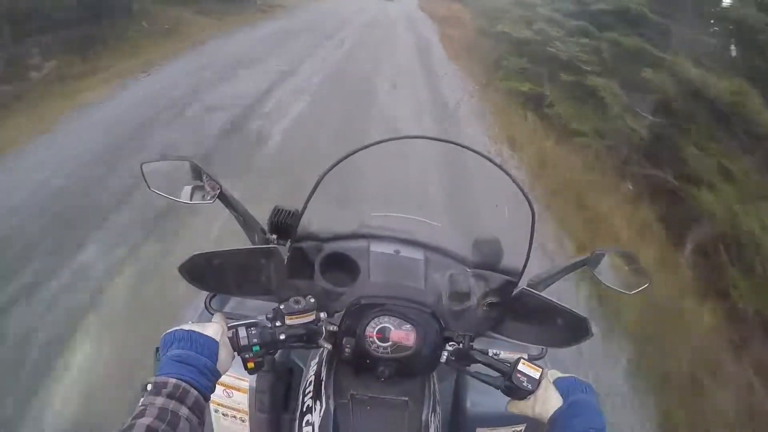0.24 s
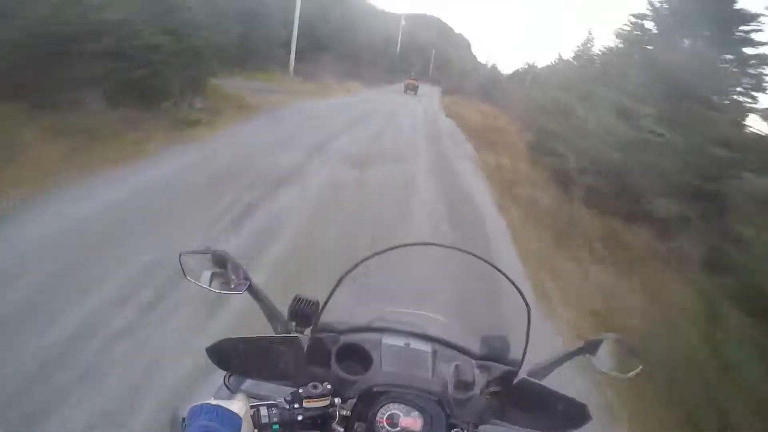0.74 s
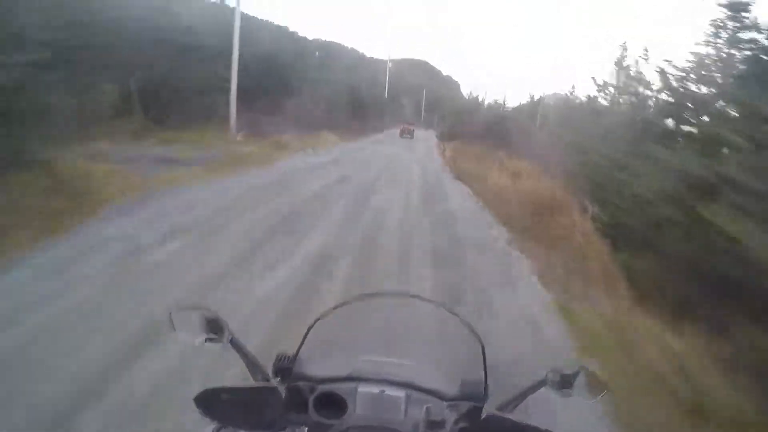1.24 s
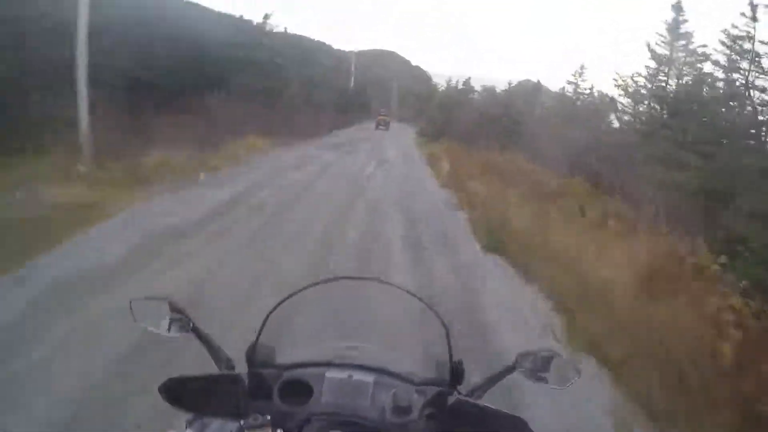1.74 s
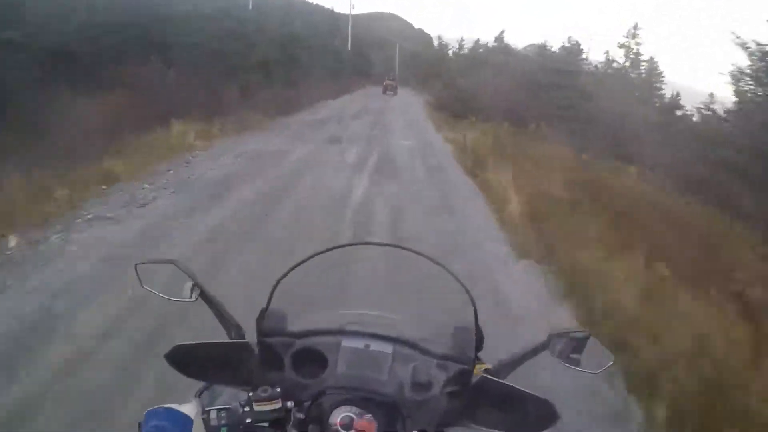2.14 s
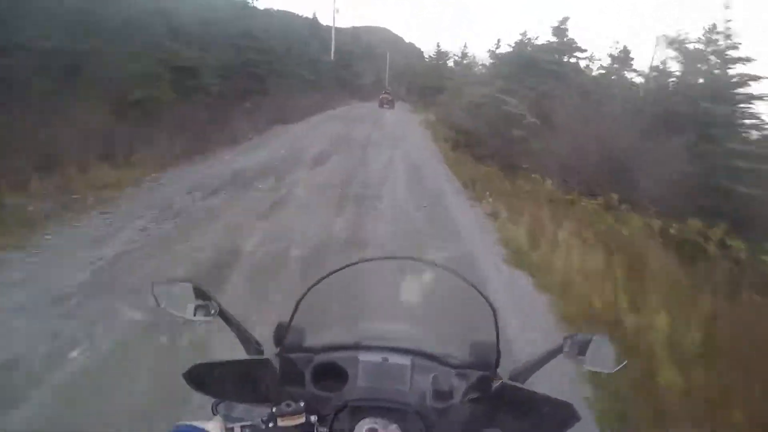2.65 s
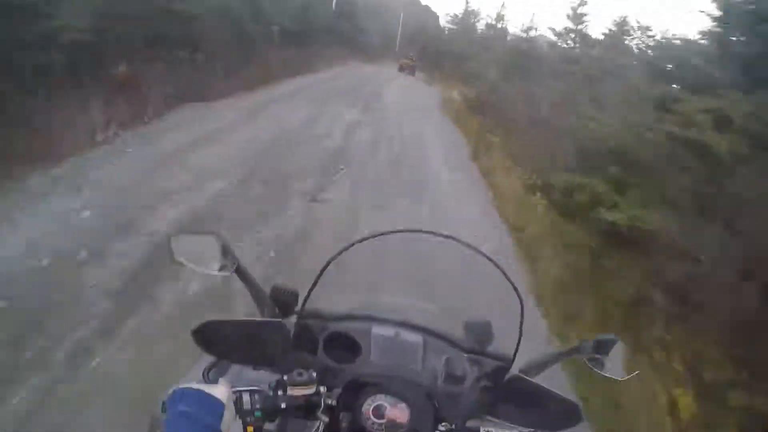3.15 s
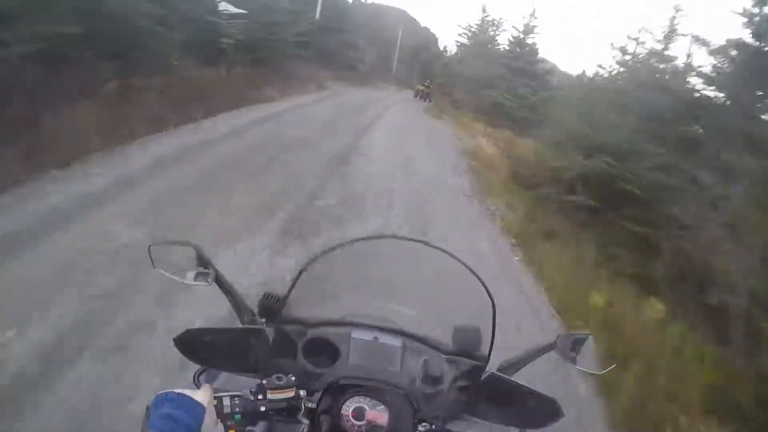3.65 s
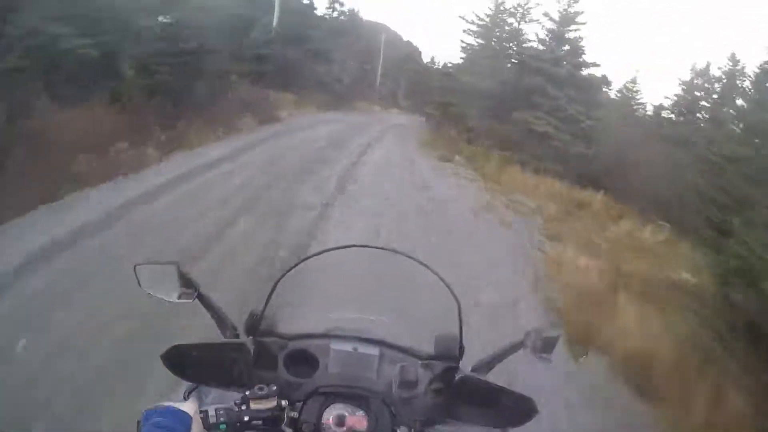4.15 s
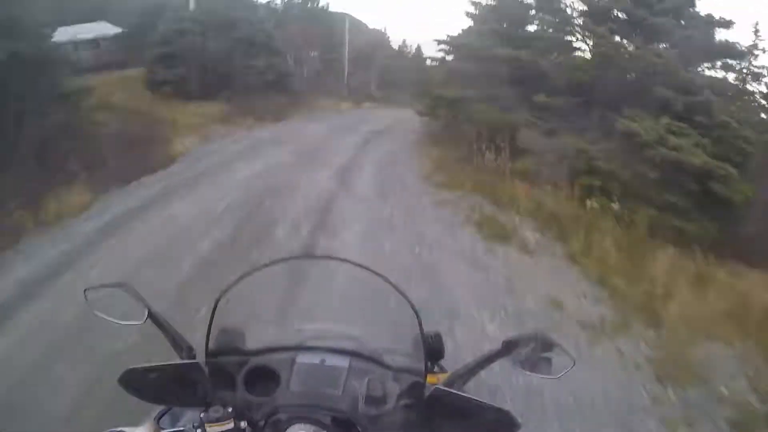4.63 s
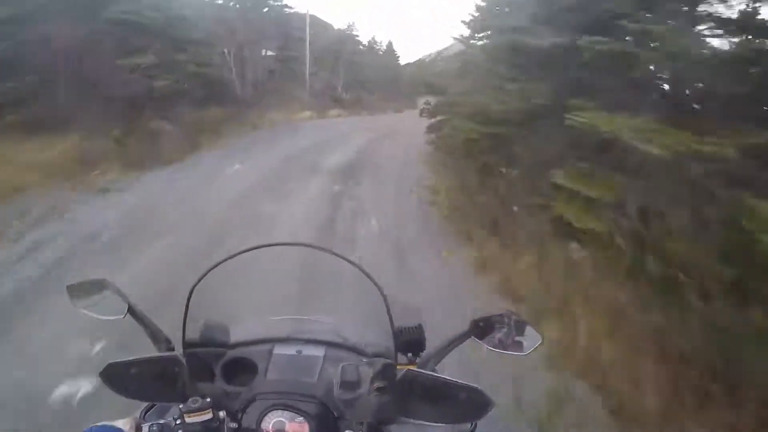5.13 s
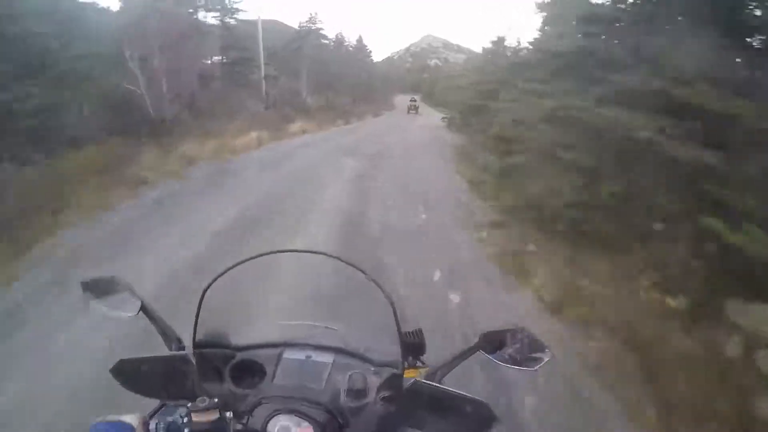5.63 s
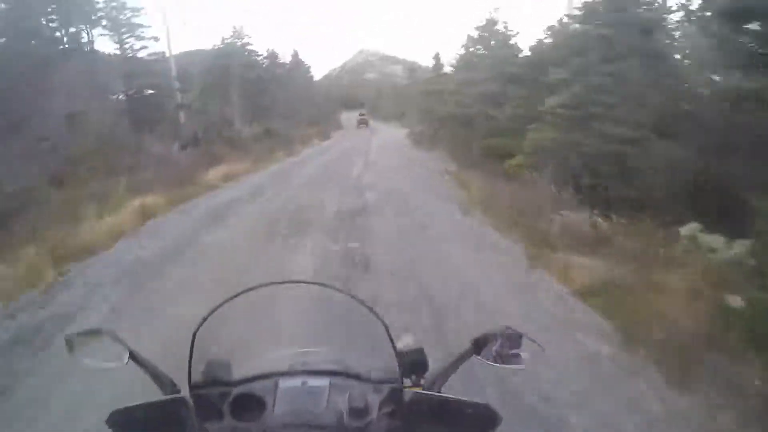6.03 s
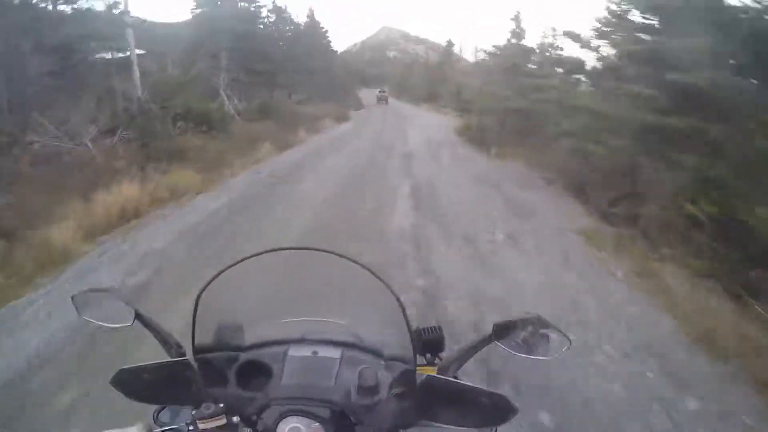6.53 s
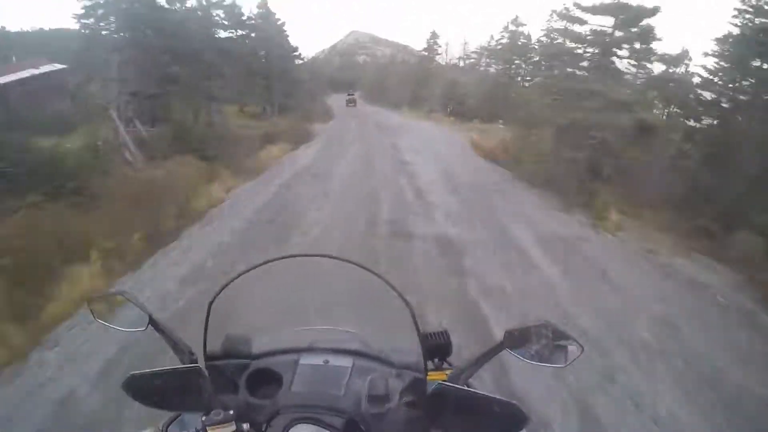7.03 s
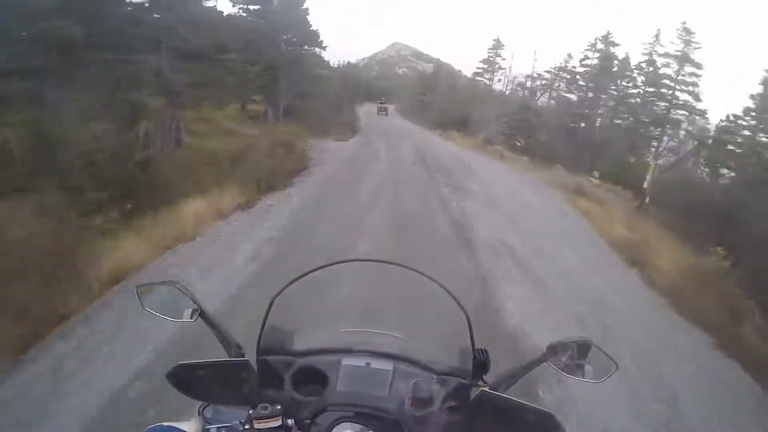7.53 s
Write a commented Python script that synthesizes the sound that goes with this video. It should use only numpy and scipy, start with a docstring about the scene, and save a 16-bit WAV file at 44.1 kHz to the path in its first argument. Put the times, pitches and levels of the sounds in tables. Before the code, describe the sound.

Hard hollow plastic clacks and dull damped thumps jolt irregularly over rushing wind, gravel road rumble and a barely audible motorcycle engine.

```python
"""A motorcycle rides along a gravel road, heard from inside the case of a camera that sits loose in its mount.
From the start, filtered noise gives wind and tyre hiss and road rumble, over a faint pulse-train engine.
From about 0.5 s each jolt rings the plastic case in short rattles of contact pulses and swings the mount in a
low, damped thump; softer dips, thin ticks and, from 1.35 s, a few stick-slip squeaks come between.
The bumps go on until about 7.6 s, where the rush of wind and tyres swells to its loudest."""
import sys
import numpy as np
from scipy import signal
from scipy.fft import rfft, irfft
from scipy.io import wavfile
from scipy.ndimage import uniform_filter1d, minimum_filter1d

SR = 44100
rng = np.random.default_rng(int(sys.argv[2]) if len(sys.argv) > 2 else 0)


def wrap_up_sound(samples):
    """Save the sound to the file named by the first command line argument, as 16-bit audio."""
    columns = np.atleast_2d(samples).T
    # keep every value between -1 and 1, then stretch to whole-number steps
    tamed = np.clip(columns, -1, 1)
    steps = np.round(tamed * 32767).astype(np.int16)
    wavfile.write(sys.argv[1], SR, steps)


N = 343098

# soft dips in the road swing the mount and let the case tap its stop, levels relative:
# (time [s], swing level [dB], early swing pitch before stiffening [Hz], tap level [dB])
SOFT_DIPS = [(0.575, -4, 54, -18), (0.71, -7.5, 69, -18), (1.085, -11.5, 73.4, -32),
             (1.146, -7.5, 62.6, -32), (1.423, 1.5, 60.7, -16), (1.536, -17, 48.4, -16.5),
             (1.9, -5, 80, -24), (2.285, -10, 47, -18), (2.36, -5.5, 58.7, -13), (3.141, -4.5, 64, -36),
             (3.925, -0.5, 65, -25), (4.13, -12, 62, -30), (4.395, -10, 68.4, -26), (4.547, 1, 63, -22),
             (4.688, -10, 90, -17), (4.78, -10, 67, -29), (5.208, -1, 72.8, -15.5),
             (5.784, -18, 59.3, -19.5), (6.135, -1.5, 58.6, -26), (6.32, -8.5, 62.4, -25),
             (6.563, -3, 55, -20), (6.823, -9.5, 64, -25), (7.075, -7, 56, -14), (7.152, -21, 59.4, -19),
             (7.396, -9, 47.7, -21), (7.64, -6, 49.2, -20)]
# hard jolts throw the case against its stop and swing the mount; the case falls back a moment later; levels relative:
# (time [s], knock level [dB], treble lift [dB], hollow body lift [dB], swing level [dB],
#  early swing pitch before stiffening [Hz], rebound delay [s], rebound knock level [dB])
HARD_JOLTS = [(0.536, -5.5, 0, -4, 1.5, 103, 0.014, -5), (0.627, -11, 8, -4, -14, 70, 0.011, -11.5),
              (0.768, -5, 7, -3.5, -7, 71, 0.031, -3.5), (0.868, -16, 2, -5, -2, 45, 0.0077, -9.5),
              (0.935, -1.5, 1, 1, -15, 46, 0.035, -32), (1.486, 1.5, 11, -1, -1.5, 89, 0.024, -14),
              (1.575, -3.5, 6.5, 0.5, -16, 76.6, 0.029, -28), (1.752, -10.5, 9, 0, -11, 70, 0.013, -12.5),
              (1.864, 0.5, 8.5, 1.5, -6.5, 46, 0.037, -12), (1.915, -13.5, 7, 6, 0, 54.5, 0.022, -8.5),
              (2.06, -3, 5, 1, -0.5, 102, .027, -5), (2.677, -7.5, -9, 9, -10, 89, 0.032, -24),
              (2.825, -2.5, 6, 0.5, 0.5, 47, 0.0098, -9), (2.95, -8.5, 6, 3, -2, 72.4, 0.0092, -6),
              (3.058, -6.5, 0, -1, -2.5, 63, 0.022, -26), (3.115, -2.5, 3, -0.5, -11, 78.8, 0.017, -14),
              (3.485, -17, -6, -7, -4, 53.7, .048, -19), (3.944, -4.5, 0, -4, 5, 61, 0.01, -12),
              (3.973, -11.5, 6, -3, -13, 45.7, 0.013, -9.5), (4.037, -2.5, 12.5, -5, -6, 48, .022, -12),
              (4.094, -3, 6, 0.5, 1.5, 55, 0.0082, -6.5), (4.221, -7.5, 4, -1, -2.5, 99.5, .022, -6.5),
              (4.525, -13, 6, 3, -13, 110, 0.036, -30), (4.678, 2, -5, 4, 0, 81, .0385, -3),
              (5.045, -10.5, 1, 2.5, 0.5, 84, 0.019, -8.5), (5.406, -3, 6, 4, 5, 90.5, 0.027, -7),
              (5.542, -6.5, 1, -7.5, 1, 75, 0.019, -11), (5.701, -4.5, 0, -1.5, 0.5, 48, 0.024, -9.5),
              (5.857, -9, -10, -1, 1, 57, 0.038, -24), (5.982, 0.5, 6, 1.5, 0, 106.2, 0.03, -10),
              (6.112, -5, 4.5, 3, -12, 49.3, 0.027, -9.5), (6.244, -3.5, 4, -0.5, -7, 98.5, 0.032, -3),
              (6.4, -8.5, 6, -2, -8.5, 84, 0.0095, -13.5), (6.455, -7.5, 6, -0.5, -21, 54, .006, -5.5),
              (6.538, -7.5, 6, 8, -0.5, 97, 0.037, -17.5), (6.667, -11, 9, -2, -2.5, 100.4, 0.014, -11.5),
              (6.868, -14, 4, 11, -28, 61.3, .03, -41), (7.035, -4.5, 2, 1.5, 3.5, 96, .028, -10),
              (7.22, -7, 7, 0, 1.5, 90, .01, -13.5)]
# smooth spectrum of a knock on the case: (frequency [Hz], relative level [dB])
KNOCK_SPECTRUM = [(60, 15), (180, 7.5), (320, -6), (550, -14), (1000, -12), (1300, -4), (1800, 0),
                  (2150, -3.5), (2650, 0), (3400, -14), (4400, -29.5), (7000, -34), (10000, -47),
                  (15000, -52)]
# resonances of the plastic case: (centre frequency [Hz], width [Hz], nominal lift [dB])
CASE_MODES = [(504, 40, 3), (586, 93, 2.5), (747, 117, 8), (1268, 49, 4), (1550, 145, 3.5), (1630, 21, 1),
              (1800, 220, 3), (2295, 150, 1.5), (2540, 230, 3), (3263, 290, 5), (3984, 620, 6),
              (5410, 1130, 6.5), (7800, 180, 2), (10870, 780, 5)]


def undb(db):
    """Amplitude ratio of a level: 20 dB for each factor of ten."""
    return 10 ** (np.asarray(db) / 20)


def unit(x):
    """Normalise the mean power: scale to rms 1."""
    return x / np.sqrt(np.mean(x ** 2))


def curves(table):
    """Linear interpolation in time of each column of a table."""
    times, *columns = np.transpose(table)
    t = np.arange(N) / SR
    return [np.interp(t, times, column) for column in columns]


def walk(rate):
    """Low-pass random fluctuation: levels held for 1 / rate [s], averaged twice, rms 1."""
    hold = max(int(SR / rate), 2)
    steps = np.repeat(rng.standard_normal(N // hold + 1), hold)
    smooth = uniform_filter1d(uniform_filter1d(steps, hold), hold)
    return unit(smooth[:N])


def response(colour, resonances=(), size=8192):
    """Minimum-phase impulse response, by folding the cepstrum of a smooth spectrum plus resonances."""
    f = np.maximum(np.arange(size // 2 + 1) * SR / size, 1)
    hz, db = np.transpose(colour)
    gain_db = np.interp(np.log(f), np.log(hz), db)
    for centre, width, lift in resonances:
        gain_db = gain_db + lift / (1 + (2 * (f - centre) / width) ** 2)
    cepstrum = irfft(np.log(undb(gain_db)))
    # doubling the causal half and dropping the rest makes the response causal
    cepstrum[1:size // 2] *= 2
    cepstrum[size // 2 + 1:] = 0
    return irfft(np.exp(rfft(cepstrum)))


def through(x, ring):
    """Linear filtering: convolve a sound with an impulse response."""
    return signal.fftconvolve(x, ring)[:len(x)]


def band(x, lo_hz, hi_hz):
    """Butterworth band-pass with gentle slopes."""
    sections = signal.butter(2, [lo_hz, min(hi_hz, .45 * SR)], "band", fs=SR, output="sos")
    return signal.sosfilt(sections, x)


def add(out, s, sound):
    """Superposition: mix a sound in at time s [s]."""
    i = max(int(s * SR), 0)
    out[i:i + len(sound)] += sound[:N - i]


def engine(wander=0.0051, rough_db=2, weak_db=-5, gain_db=0):
    """Periodic excitation: one muffled exhaust pulse per firing, strong and weak in turn."""
    # (time [s], mean firing rate [Hz], level [dB])
    engine_course = [(0, 94.2, -37.5), (.5, 95.5, -42.5), (1.4, 104.2, -43.5), (2.3, 90.4, -48),
                     (3.15, 90.4, -42), (3.45, 101.1, -39.5), (3.6, 105, -39), (3.85, 110.5, -34),
                     (4.3, 105.6, -47), (4.85, 96.7, -51), (6, 101.6, -46), (7.78, 94.3, -47.5)]
    # smooth spectrum of the muffled exhaust: (frequency [Hz], relative level [dB])
    exhaust_spectrum = [(40, -19), (100, 7.5), (200, -6), (330, -10.5), (470, -9.5), (620, -19),
                        (1200, -44)]
    firing_hz, level_db = curves(engine_course)
    unsteady_hz = firing_hz * (1 + wander * walk(12))
    firings = np.floor(np.cumsum(unsteady_hz) / SR)
    strength_db = rough_db * walk(50) + weak_db * (firings % 2)
    pulses = np.diff(firings, prepend=0) * undb(strength_db)
    exhaust = band(through(pulses, response(exhaust_spectrum)), 80, 1400)
    return unit(exhaust) * undb(level_db + gain_db)


def rumble(gain_db=-1.5, patchy_db=2):
    """Random forcing of a resonator: the rough road shakes the mount around its free pitch, in patches."""
    # road roughness: (time [s], relative rumble level [dB])
    road_course = [(0, -24), (.8, -27.5), (1.7, -25.5), (2.2, -36), (2.55, -24), (3.25, -34), (3.6, -21),
                   (4.3, -29.5), (5.3, -27.5), (6.5, -25.5), (6.95, -30), (7.55, -19), (7.78, -25)]
    # smooth spectrum of the shaken mount: (frequency [Hz], relative level [dB])
    rumble_spectrum = [(10, -42), (25, -16.5), (45, 1), (58, 2.5), (67, -5), (80, -3.5), (120, -20),
                       (200, -22.5), (400, -45), (1500, -82)]
    rumble_db, = curves(road_course)
    shaking = unit(through(rng.standard_normal(N), response(rumble_spectrum)))
    return shaking * undb(rumble_db + gain_db + patchy_db * walk(14))


def rush(rush_db, hiss_db, gain_db=-0.02, top_db=0.8, flutter_db=1.0, gust_db=1.23):
    """Turbulence as filtered noise: wind and tyres gust and flutter through the case, a finer hiss on top."""
    # smooth spectrum of wind and tyres: (frequency [Hz], relative level [dB])
    rush_spectrum = [(150, 0.5), (300, -7), (600, -16.5), (1050, -13), (1500, -0.5), (2000, 1), (2700, 3),
                     (3400, -4), (4050, -8), (4500, -21.5), (6000, -26.5), (15000, -49)]
    # smooth spectrum of the top hiss: (frequency [Hz], relative level [dB])
    hiss_spectrum = [(2500, -19.5), (4600, 2), (6000, 0), (7500, 4), (9000, -3.5), (11000, -10),
                     (13000, -9.5), (15000, -20)]
    flutter = undb(flutter_db * walk(70) + gust_db * walk(8.3))
    body = unit(through(rng.standard_normal(N), response(rush_spectrum, CASE_MODES)))
    top = unit(through(rng.standard_normal(N), response(hiss_spectrum, CASE_MODES)))
    return flutter * (body * undb(rush_db + gain_db) + top * undb(hiss_db + top_db))


def jiggle(rush_db, rate=70, gain_db=-8):
    """Random impacts: small stones keep the loose case ticking, about rate times a second."""
    chance, strength = rng.random(N), rng.exponential(size=N)
    ticks = (chance < rate / SR) * np.minimum(strength, 2) ** 2
    ringing = unit(through(ticks, response(KNOCK_SPECTRUM, CASE_MODES)))
    return ringing * undb(rush_db + gain_db)


def squeaks(waver=0.055):
    """Stick-slip friction: plastic slips on plastic in brief, scratchy tones of unsteady pitch."""
    # (time [s], length [s], mean pitch [Hz], rms level at the crest [dB])
    slips = [(1.348, 0.06, 5220, -37), (1.382, 0.042, 2424, -20.5), (4.522, 0.014, 4060, -23.5),
             (4.666, 0.02, 2480, -22), (6.293, 0.022, 2450, -22)]
    out, drift = np.zeros(N), walk(1100)
    for s, length, hz, db in slips:
        pitch = hz * (1 + waver * drift[int(s * SR):int((s + length) * SR)])
        tone = np.sqrt(2) * np.sin(2 * np.pi * np.cumsum(pitch) / SR)
        add(out, s, undb(db) * np.hanning(len(pitch)) * tone)
    return out


def swings(rebound_hz=58.4, rebound_db=-16.5, spends=0.4):
    """Momentum exchange: every push on the mount as (s, dB, Hz); a louder rebound knock leaves less swing."""
    out = [(s, db, hz) for s, db, hz, _ in SOFT_DIPS]
    for s, _, _, _, db, hz, after_s, rebound_knock_db in HARD_JOLTS:
        out.append((s, db, hz))
        # a rebound swings the mount near its free pitch
        out.append((s + after_s, db + rebound_db - spends * rebound_knock_db, rebound_hz))
    return out


def thumps(gain_db=1.5, rest_hz=61, relax_s=0.049, stiff=0.3, stiff_s=0.0054, rise_s=0.0029,
           sway_hz=36, sway_db=-10, sway_s=0.039, leak_hz=12,
           ring_s=0.1, ring_shrink_db=14, free_ring_s=0.2, size=13000):
    """Damped nonlinear oscillator: the mount is stiffer against its stop, then relaxes to its free pitch."""
    out, t = np.zeros(N), np.arange(size) / SR
    # what carries the mount gives way too, slower and well damped
    sway = -undb(sway_db) * np.sin(2 * np.pi * sway_hz * t) * np.exp(-t / sway_s)
    for s, db, hz in swings():
        # wide swings rub against the stop: ring_shrink_db more dies e times sooner
        t60 = min(ring_s * np.exp(-db / ring_shrink_db), free_ring_s)
        relaxing_hz = rest_hz + (hz - rest_hz) * np.exp(-t / relax_s)
        pitch = relaxing_hz * (1 + stiff * np.exp(-t / stiff_s))
        decay = np.exp(-np.log(1000) * t / t60)
        swing = -np.sin(2 * np.pi * np.cumsum(pitch) / SR) * decay
        add(out, s, undb(db + gain_db) * (1 - np.exp(-t / rise_s)) * (swing + sway))
    # steady pressure leaks away
    return signal.sosfilt(signal.butter(1, leak_hz, "high", fs=SR, output="sos"), out)


def blows(count=3, tick_treble_db=-14, tick_body_db=-18, tap_after_s=.014, tap_body_db=3,
          rebound_treble_db=-1.5, rebound_body_db=1.5, chatter_from_s=.007, chatter_span_s=.042,
          chatter_db=-10.5, chatter_follows=0.47, chatter_fade_db_per_s=165,
          chatter_scatter_db=2.74, chatter_body_db=5):
    """Repeated impact with loss: each contact as (s, dB, treble lift dB, hollow body lift dB)."""
    # glancing contacts give a thin tick and no swing: (time [s], relative level [dB])
    glances = [(1.402, -10.5), (2.214, -16), (2.746, -8.5), (3.846, -9.5), (4.156, -12.5), (4.577, -11),
               (5.662, -12), (5.938, -15), (6.122, -7.5), (6.68, -12), (6.984, -16.5), (7.626, -15)]
    out = [(s, db, tick_treble_db, tick_body_db) for s, db in glances]
    # a hollow tap follows each soft dip
    out += [(s + tap_after_s, tap_db, 0, tap_body_db) for s, _, _, tap_db in SOFT_DIPS]
    for s, db, treble_db, body_db, _, _, after_s, rebound_db in HARD_JOLTS:
        out.append((s, db, treble_db, body_db))
        # a rebound is blunter than its jolt
        out.append((s + after_s, rebound_db, treble_db + rebound_treble_db, body_db + rebound_body_db))
        # loose chatter follows at uneven gaps, fades, and takes on a share of the jolt's dB
        lags = chatter_from_s + chatter_span_s * (np.arange(count) + rng.random(count)) / count
        mean_db = chatter_db + chatter_follows * db - chatter_fade_db_per_s * lags
        levels = mean_db + chatter_scatter_db * rng.standard_normal(count)
        out += [(s + lag, level, 0, chatter_body_db) for lag, level in zip(lags, levels)]
    return out


def knocks(gain_db=-4.0, first_hit=1.52, grit_db=8, chatter_s=0.0021, usual_db=-11, heavy_db=35,
           rise_s=0.00092, tail_db=-24, tail_s=0.015, spot_db=0.86, size=3000):
    """Modal excitation: a first contact, then tiny rebounds as the plastic faces settle, ring the case."""
    out, t = np.zeros(N), np.arange(size) / SR
    hz, base_db = np.transpose(KNOCK_SPECTRUM)
    # square hits are brighter, blunt ones more hollow
    treble_part = np.interp(hz, [3000, 6000, 12000], [0, .8, 1.3])
    body_part = np.interp(hz, [60, 250, 800, 1500], [0, 1, 1, 0])
    for s, db, treble_db, body_db in blows():
        contacts, grit, spot = rng.standard_normal((3, size))
        # harder blows take longer to settle
        settle_s = chatter_s * np.exp((db - usual_db) / heavy_db)
        decay = np.exp(-t / settle_s) + undb(tail_db) * np.exp(-t / tail_s)
        settle = (1 - np.exp(-t / rise_s)) * decay
        rebounds = np.sign(contacts) * undb(grit_db * np.minimum(grit, 2))
        force = unit(rebounds) * settle
        force[0] += first_hit
        shade_db = treble_db * treble_part + body_db * body_part
        # each contact spot favours other resonances
        modes = [(centre, width, lift + spot_db * luck)
                 for (centre, width, lift), luck in zip(CASE_MODES, spot)]
        spectrum = np.column_stack([hz, base_db + shade_db])
        knock = through(force, response(spectrum, modes, size=2048))
        # the loudest short-time rms of the clack sets the level
        clack = band(knock, 350, 9000)
        peak = np.sqrt(uniform_filter1d(clack ** 2, size=128).max())
        add(out, s, knock / peak * undb(db + gain_db))
    return out


def scene():
    """Superposition of all sources at the one microphone inside the case."""
    # the ride: (time [s], relative level of wind and tyres [dB], relative level of top hiss [dB])
    ride_course = [(0.0, -27, -45.5), (0.45, -29, -46.5), (0.76, -24, -41), (1.23, -23, -42),
                   (1.54, -29.5, -48), (2.4, -30.5, -50.5), (2.93, -26.5, -46), (3.14, -33.5, -52.5),
                   (3.44, -31.5, -50.5), (3.92, -25, -45), (4.05, -29.5, -49), (4.2, -32, -51),
                   (4.92, -30.5, -51), (5.39, -26.5, -48), (5.98, -27.5, -48), (6.24, -32, -53),
                   (7.43, -27.5, -47), (7.78, -20.5, -38)]
    rush_db, hiss_db = curves(ride_course)
    surroundings = engine() + rumble() + rush(rush_db, hiss_db)
    camera = jiggle(rush_db) + squeaks() + thumps() + knocks()
    return (surroundings + camera)[None]


def record(dry, limit=1.265, low_cut_hz=6, top_hz=15100, order=48):
    """Gain reduction and saturation: the camera's limiter ducks and rounds hard knocks; band edges are cut."""
    headroom = limit / np.maximum(np.abs(dry), limit)
    # the lowest gain within order samples, smoothed over as many
    limited = dry * uniform_filter1d(minimum_filter1d(headroom, order), order)
    rounded = limited / (1 + (limited / .97) ** 8) ** (1 / 8)
    centred = signal.sosfilt(signal.butter(1, low_cut_hz, "high", fs=SR, output="sos"), rounded)
    return signal.sosfilt(signal.ellip(8, .2, 70, top_hz, fs=SR, output="sos"), centred)


dry = scene()
out = record(dry)
wrap_up_sound(out)
```